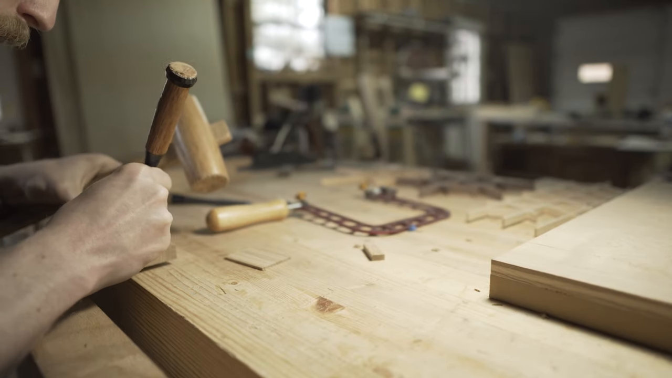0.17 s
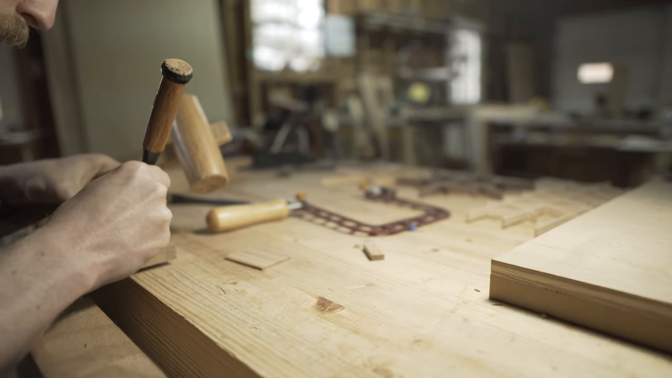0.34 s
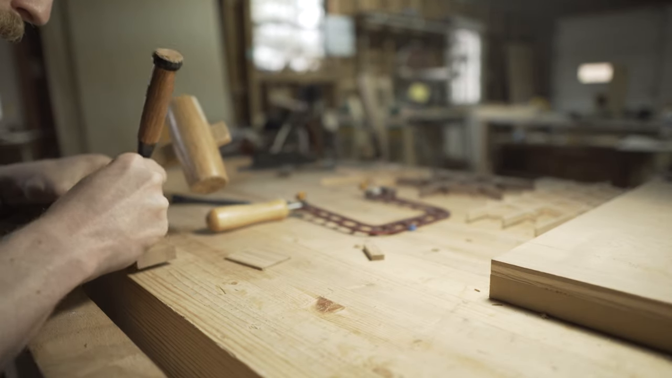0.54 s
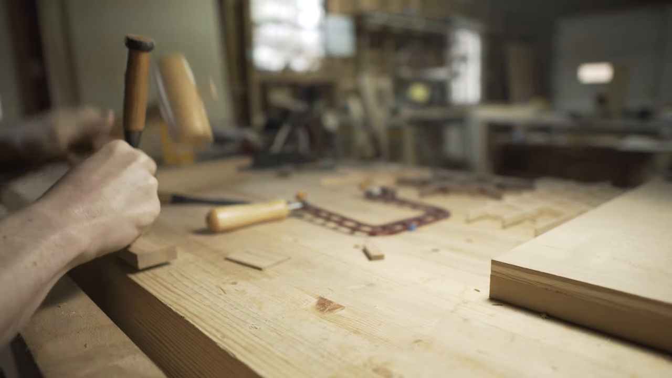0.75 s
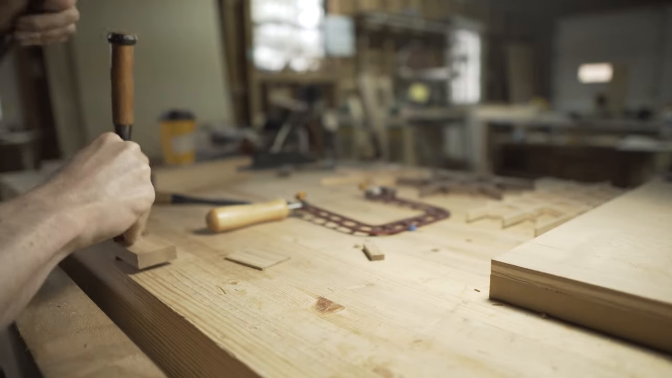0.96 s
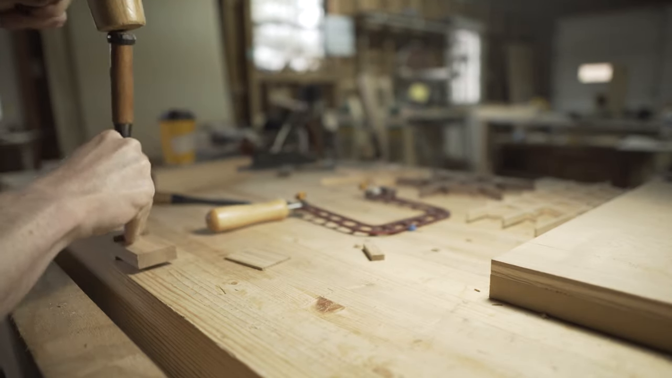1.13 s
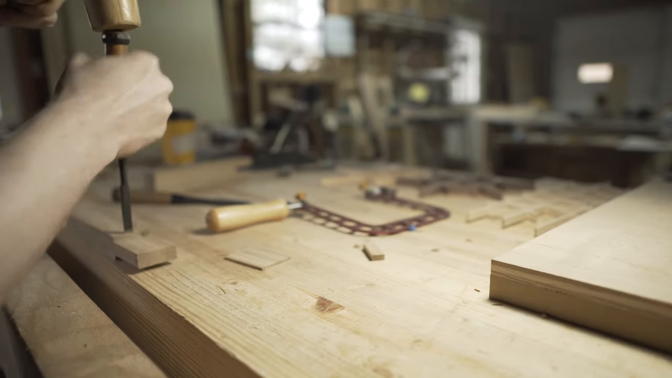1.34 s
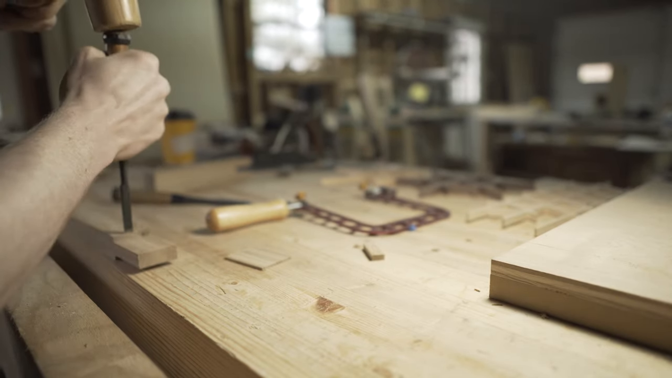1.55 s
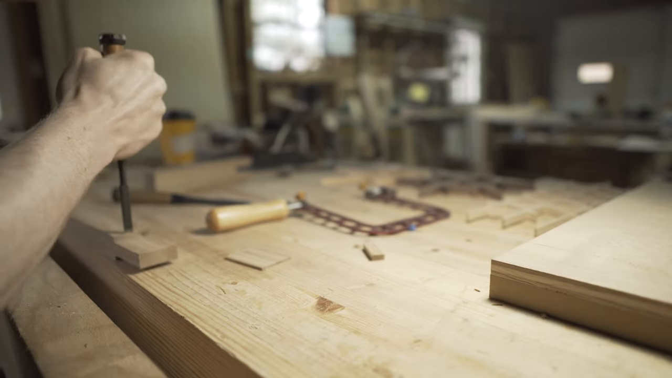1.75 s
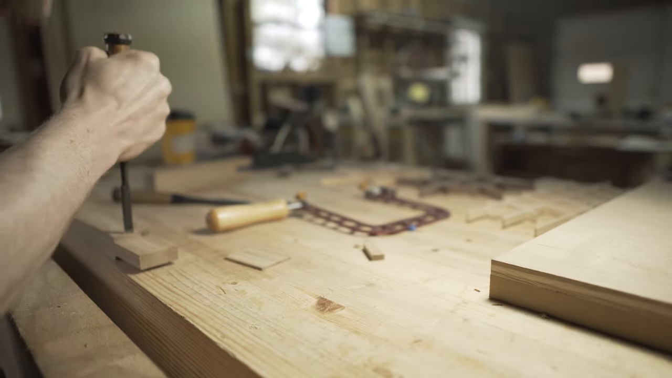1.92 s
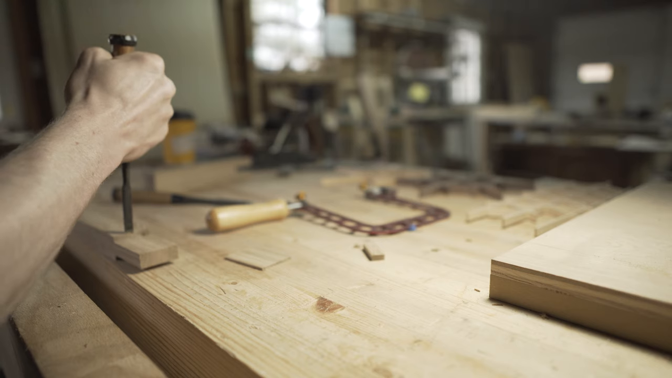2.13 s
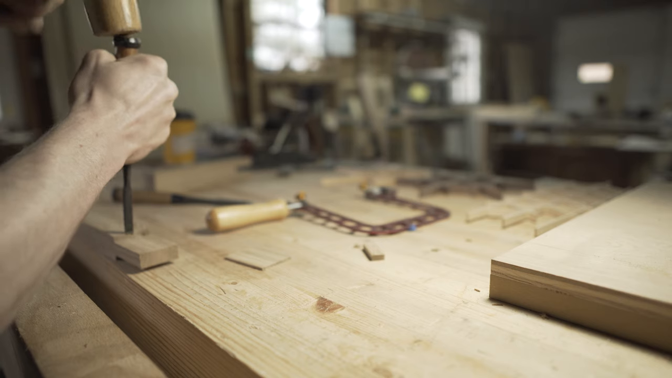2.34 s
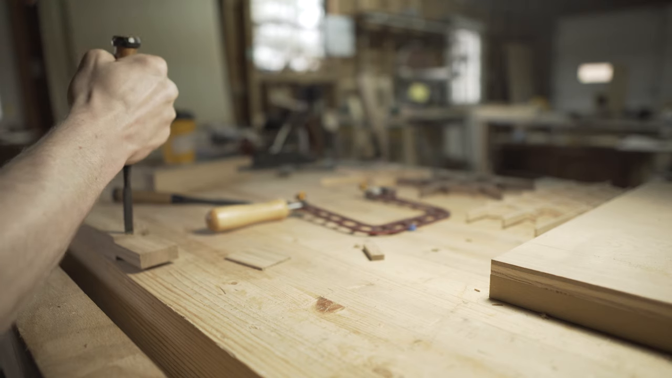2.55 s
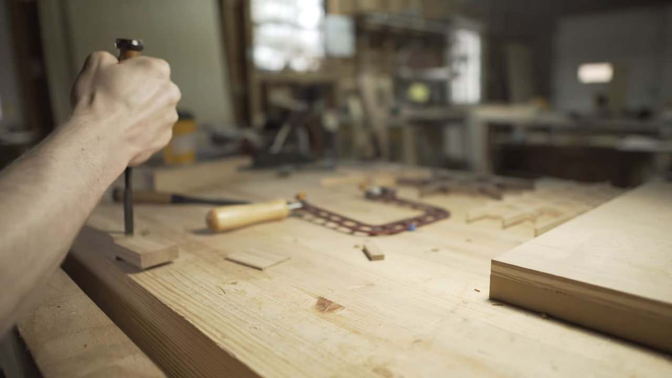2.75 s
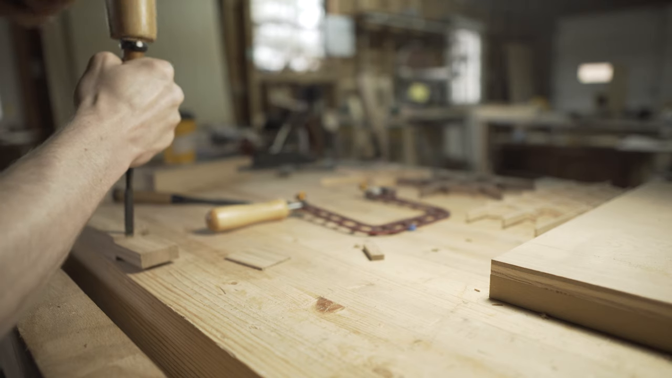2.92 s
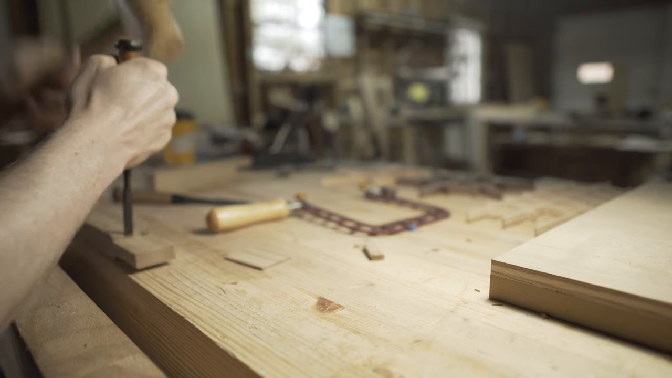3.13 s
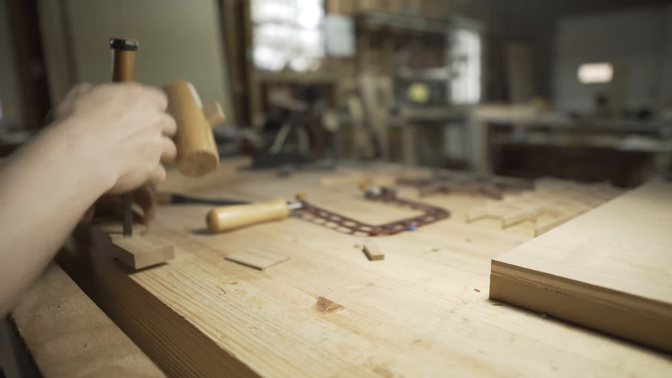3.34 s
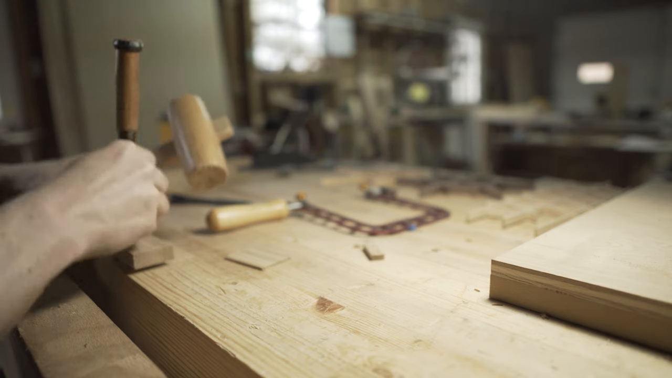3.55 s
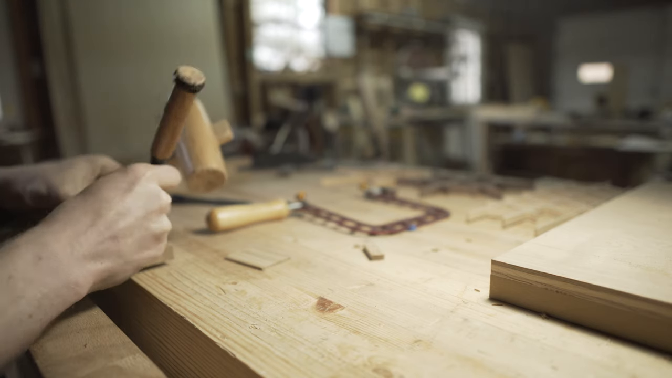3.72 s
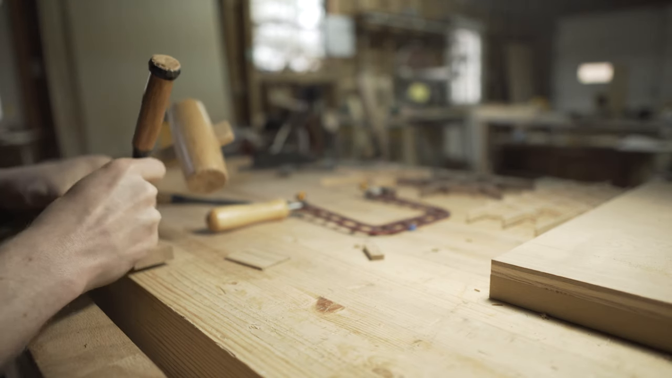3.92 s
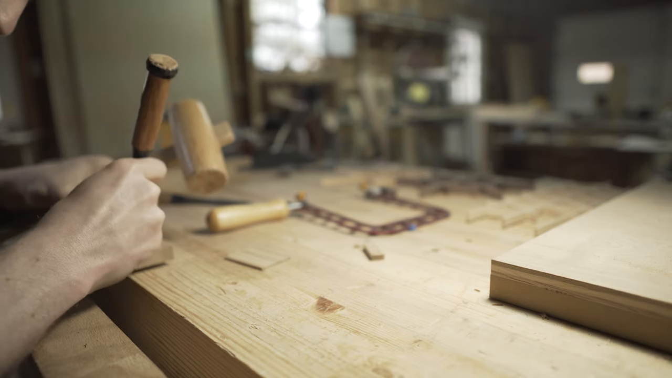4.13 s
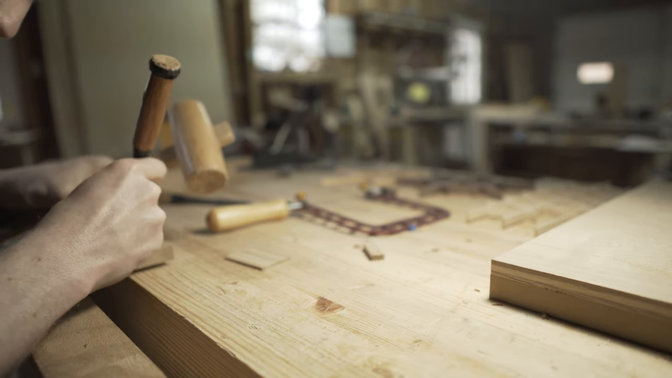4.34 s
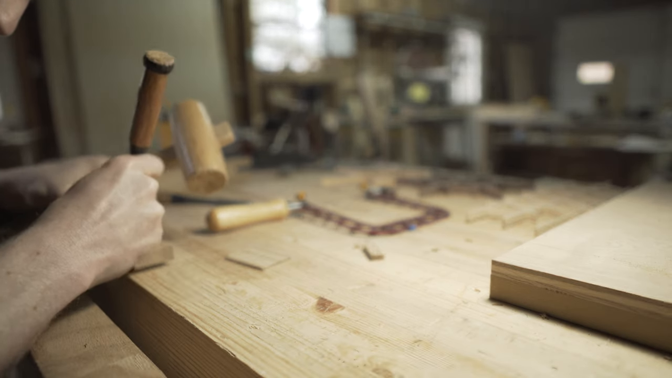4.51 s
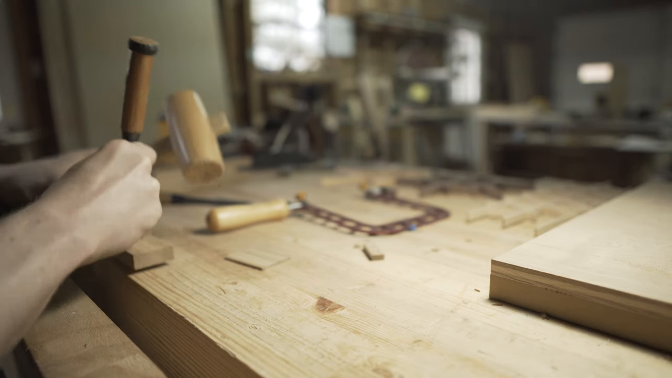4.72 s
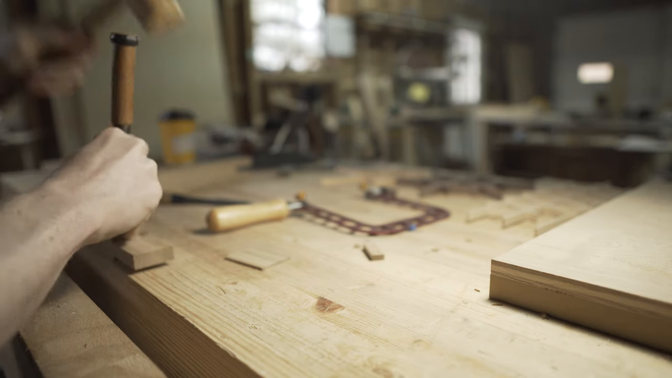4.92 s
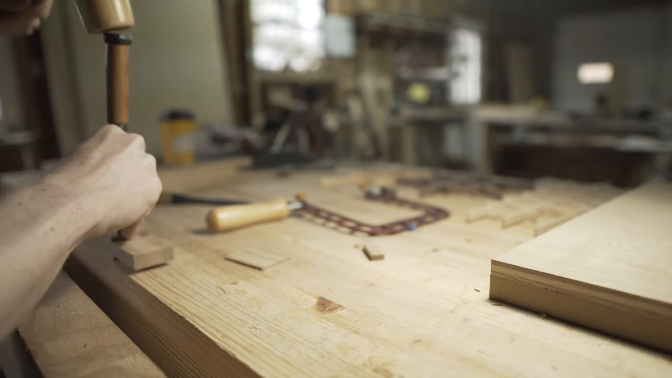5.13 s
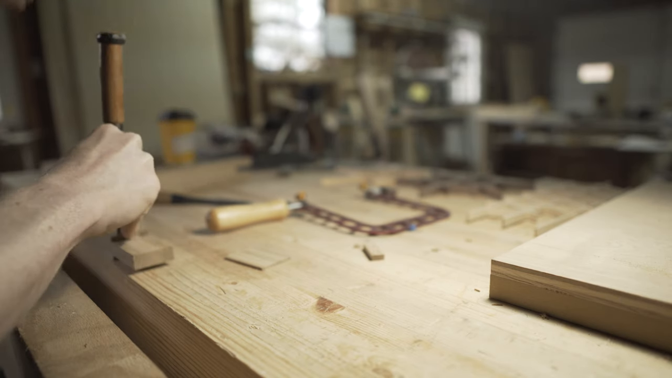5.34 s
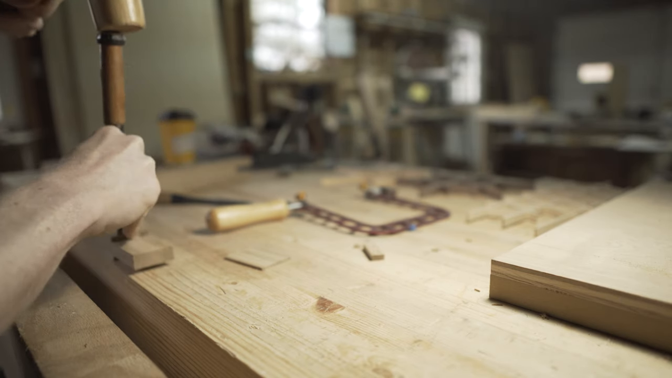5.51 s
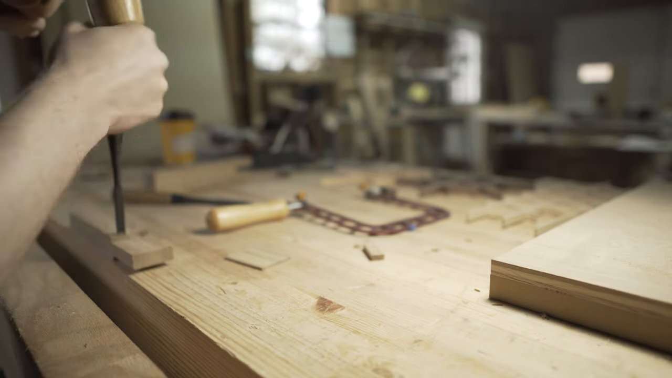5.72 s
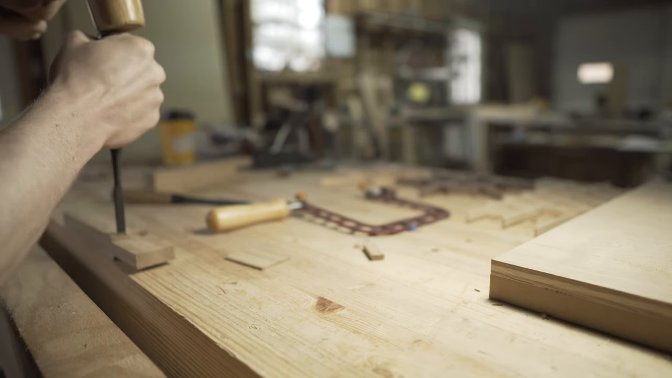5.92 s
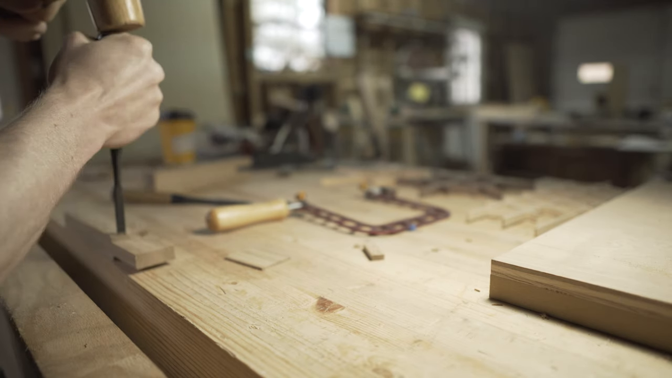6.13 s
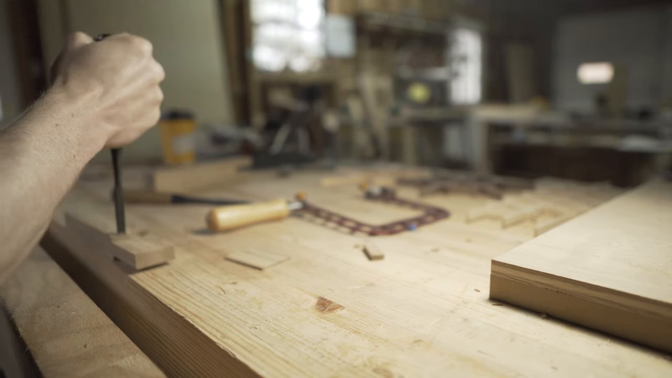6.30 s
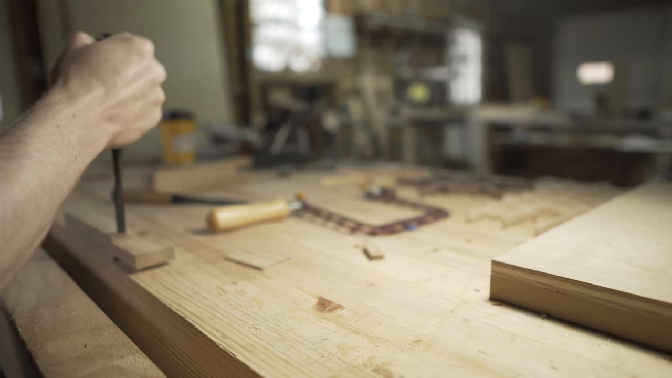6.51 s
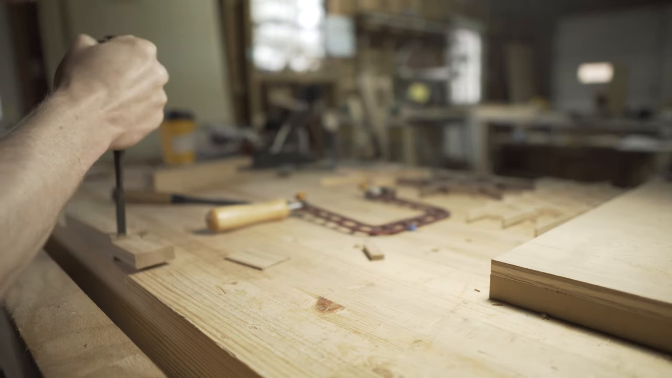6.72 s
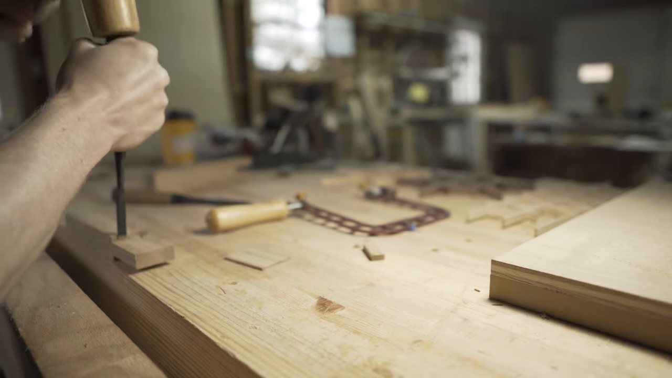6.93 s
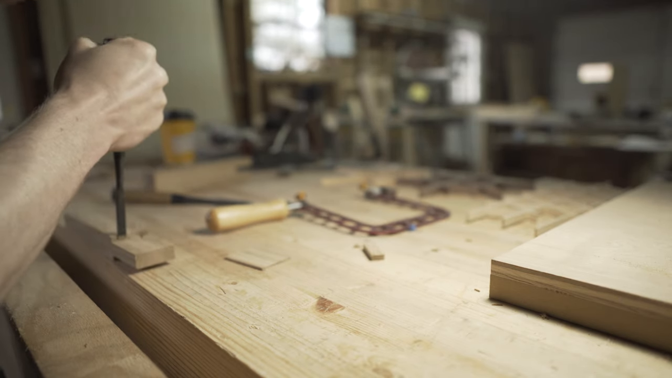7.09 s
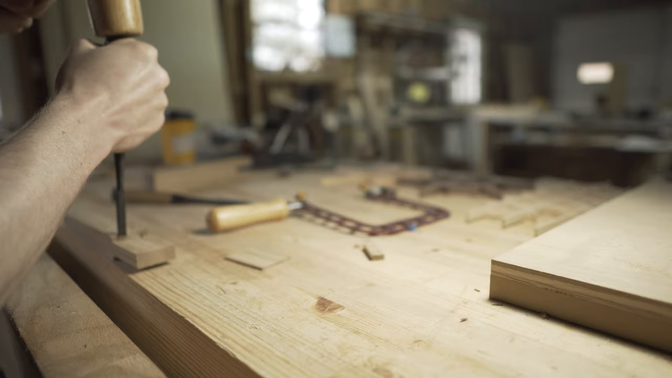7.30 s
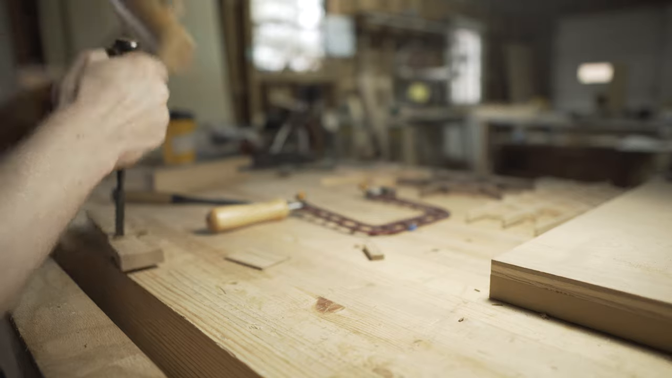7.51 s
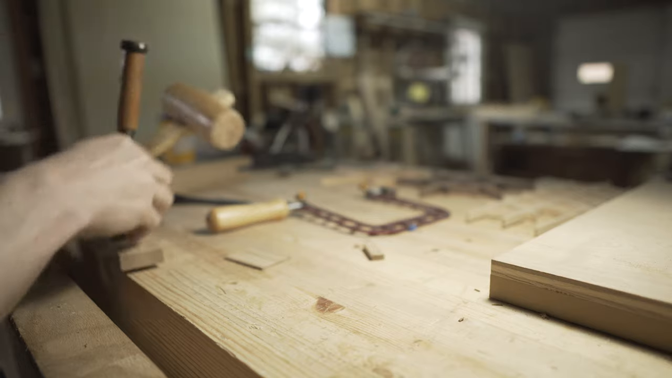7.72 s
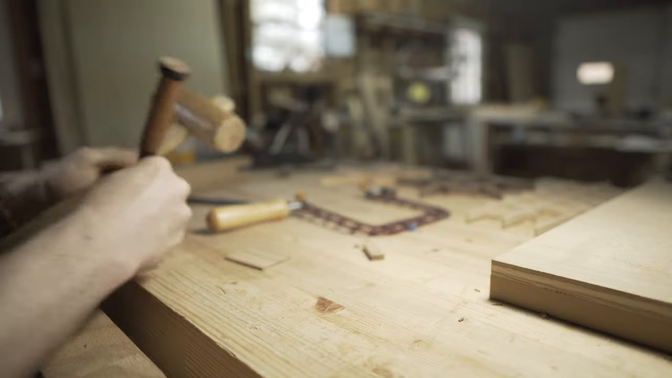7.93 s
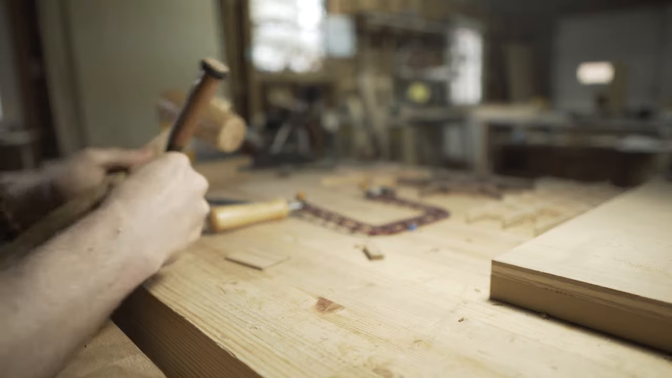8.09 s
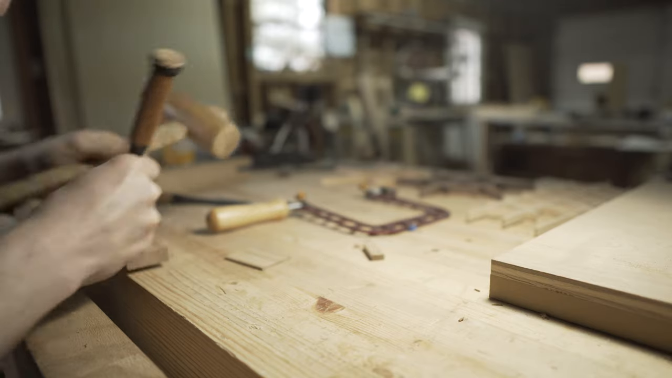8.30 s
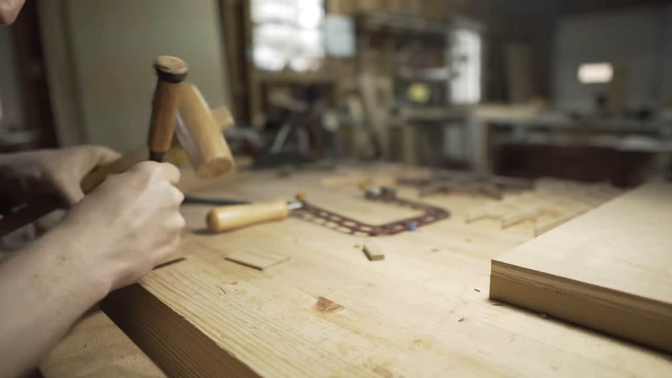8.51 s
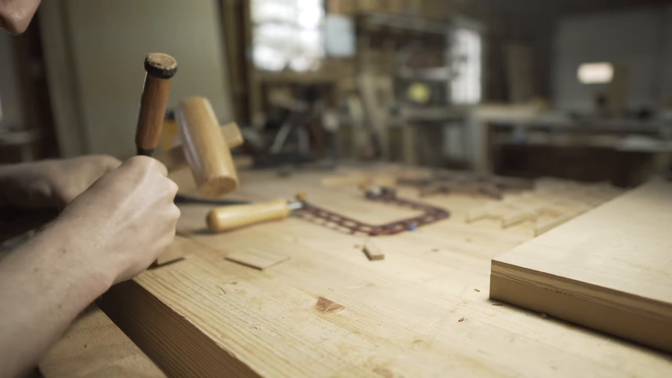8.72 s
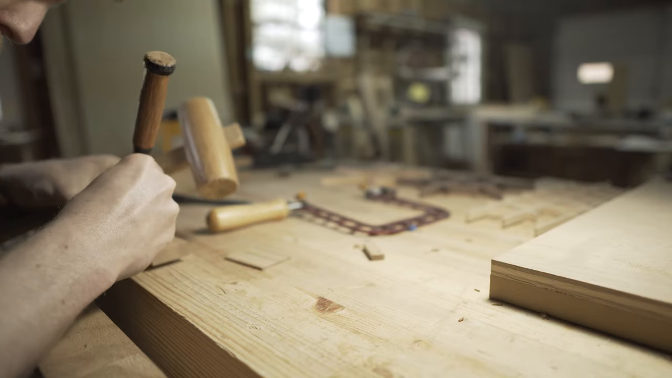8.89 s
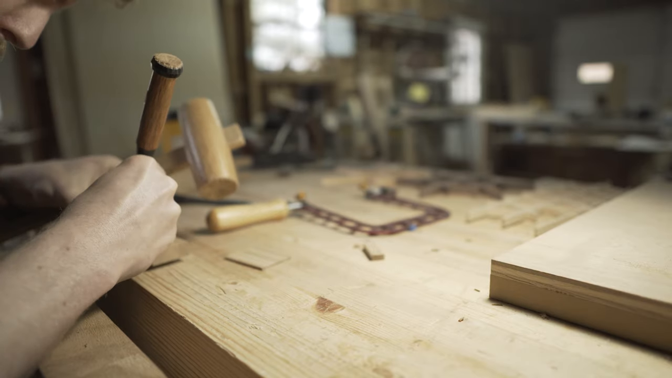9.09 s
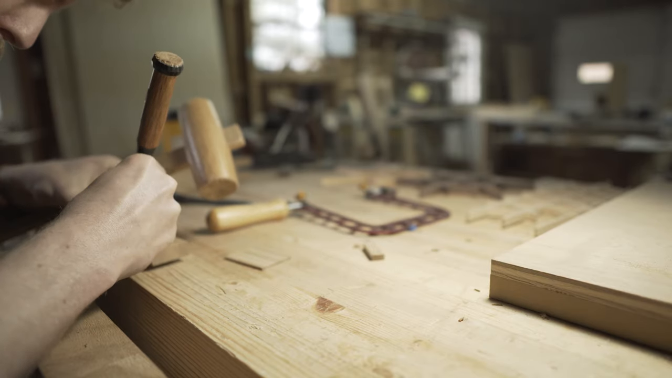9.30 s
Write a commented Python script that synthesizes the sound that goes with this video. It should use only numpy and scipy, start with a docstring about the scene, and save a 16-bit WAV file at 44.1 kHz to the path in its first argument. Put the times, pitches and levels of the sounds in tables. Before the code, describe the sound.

A wooden mallet strikes a chisel in short bursts of sharp, ringing knocks, with pauses and light tool handling in a quiet workshop.

```python
"""A live workshop, a stereo microphone close to the bench, a soft rush of room tone behind.
A wooden mallet drives a chisel into a block in four short bursts. Each blow rings the tools and the
bench and fills the room; the harder the contact, the brighter it is. Between bursts the hand slides
along the chisel, and there are light knocks and ticks as it is pulled free and the tools are lowered.
The recorder's limiter flattens each blow and lets the echo swell back."""
import sys
import numpy as np
from scipy import signal
from scipy.fft import rfft, irfft, next_fast_len
from scipy.io import wavfile
from scipy.ndimage import uniform_filter1d

SR = 44100
rng = np.random.default_rng(int(sys.argv[2]) if len(sys.argv) > 2 else 0)


def persist_wave(psi):
    """Save psi, clipped to +-1, as 16-bit WAV."""
    counts = np.round(np.clip(psi, -1, 1) * 32767).astype(np.int16)
    wavfile.write(sys.argv[1], SR, np.atleast_2d(counts).T)


N = 412335

# The room at the microphone. Each row: frequency in Hz, left-right likeness from 0 to 1.
STEREO_LIKENESS = [(130, 1), (300, 0.98), (600, 0.88), (1100, 0.65), (2200, 0.6), (4500, 0.088),
                   (9000, 0.061)]
# The room tone's rise and fall. Each row: time in seconds, level in dB.
ROOM_LEVEL = [(0, -59.5), (1.9, -57.5), (3.5, -66), (4.4, -69), (5.15, -60.5), (6.5, -60.5), (8.2, -65),
              (8.8, -58), (9.35, -59.5)]
# Spectra of the room's rush and rumble, skin on the chisel, the blade's click, and mallet, handle
# and blade together. Each row: frequency in Hz, relative spectral level in dB.
RUSH_SPECTRUM = [(100, -35.5), (300, -18), (520, -2), (1300, 0), (2200, -2), (4000, -8), (7000, -13.5),
                 (15500, -15)]
RUMBLE_SPECTRUM = [(20, -27), (50, -13.5), (90, -9.5), (185, -8.5), (238, 1), (290, -9.5), (420, -4.5),
                   (1000, -38.5), (4000, -78.5)]
SKIN_SPECTRUM = [(300, -35.5), (1500, -3), (3500, -3.5), (7000, -6), (11000, -2), (15500, -3.5)]
CLICK_SPECTRUM = [(1800, -20), (2900, -7.5), (3800, -9), (6000, -5.5), (11000, -8.5), (14500, 5)]
TOOL_SPECTRUM = [(30, -50.5), (95, -36), (130, -25), (220, -14.5), (330, -7.5), (450, -6), (650, -3.5),
                 (880, -5), (1500, -3.5), (1950, -11.5), (5000, -14.5), (6300, -27), (14000, -31),
                 (16500, -36)]
# Nudges on the bench. Each row: peak time in seconds, pitch in Hz, level in dB, half-width in seconds.
BENCH_BUMPS = [(0.822, 129, -65.5, 0.085), (3.794, 540, -59, 0.013), (4.105, 550, -64, 0.0088),
               (8.195, 535, -71, 0.098), (8.605, 567, -62, 0.051)]
# The hand on the chisel. Each row: peak time in seconds, level in dB, half-width in seconds.
HAND_SLIDES = [(0.873, -55.5, .13), (1.416, -50.5, .09), (3.367, -63.5, 0.21), (4.922, -60.5, .14),
               (5.775, -49.5, .08), (7.605, -58.5, 0.17), (8.354, -61.5, 0.077), (8.637, -59.5, 0.084)]
# Mallet blows. Each row: start in seconds, level in dB, hardness in dB, bench thud in dB, then,
# shifting with grip and bite, wood resonance, blade resonance and hollow, all in Hz.
MALLET_BLOWS = [(1.1169, -10, -11, 3.5, 1914, 6600, 4300), (2.0355, -2.5, 0.5, 0.5, 1520, 2513, 7700),
                (2.3667, -3, 9, -3.5, 705, 5290, 2900), (2.6847, -7, 9.5, -1.5, 1713, 6880, 5440),
                (2.9526, -4.8, 8.5, 0, 695.5, 6160, 3953), (5.1887, -10.5, -18, -1.5, 402, 2070, 5270),
                (5.4868, -3.5, -3.5, -1.5, 786, 7280, 2874), (6.6513, -2.5, 4.5, -7, 600, 7900, 2330),
                (7.0140, -4.5, 7, -5.5, 578, 5240, 5930), (7.2939, -7, 2, 2, 1390, 9370, 6300)]
# Hard contact lifts the treble. Each row: frequency in Hz, lift in dB per dB of hardness.
HARDNESS_LIFT = [(1100, 0), (2400, 0.7259), (5000, 0.91), (9000, 0.92)]
# A solid seat on the bench lifts the bass. Each row: frequency in Hz, lift in dB per dB of thud.
THUD_LIFT = [(150, 0.22), (420, 2), (900, 0)]
# The tools' resonances and the hollows between. Each row: centre in Hz, width in Hz, lift in dB.
TOOL_RESONANCES = [(1096, 140, 10.5), (2219, 73, 7.5), (2698, 430, 4), (3340, 420, -3), (5120, 140, 1),
                   (6900, 700, -1.5), (7370, 360, 8.5), (7930, 250, 4), (9000, 470, -1), (10070, 430, 6),
                   (11600, 400, 2), (13100, 730, 6.5)]
# The workshop's echo. Each row: frequency in Hz, seconds to fall 60 dB.
ROOM_DECAY = [(100, 0.51), (300, 0.79), (1100, 0.63), (2500, 0.6), (5000, 0.51), (8000, 0.42),
              (14000, 0.27)]
# The bench and the free mallet ringing. Each row: pitch in Hz, level in dB, seconds to fall 60 dB.
BENCH_MODES = [(132.4, -30, 0.59), (185.2, -26, 0.5), (241.4, -19, 0.65), (318, -12, 0.57), (364, -22, .6),
               (404, -18, 0.52), (509, -9.5, 0.26), (569.7, -11, 0.66), (676, -13.5, 0.52),
               (744, -18.5, 0.57), (995, -15, 0.23), (1092, -16.5, 0.5), (1135, -17.5, .7),
               (1216, -24.5, 0.45), (1367, -26.5, 0.44), (1354, -18.5, 0.46), (1510, -21, 0.69),
               (1470, -21, 0.28), (2360, -22.5, 0.4)]
MALLET_MODES = [(694, -7.5, 0.95), (1154, 3, 0.63), (1530, -7, 0.57), (1720, 7, 0.086), (2270, 0.5, 0.22),
                (2684, -4.5, 0.37), (4600, -22, 0.22)]
# Light knocks and ticks. Each row: start in seconds, level in dB, brightness in dB per octave,
# resonance in Hz, relative level of the mallet's ring in dB.
LIGHT_KNOCKS = [(3.390, -33, -1, 6000, -24), (3.782, -61.5, 12, 5500, -41), (7.991, -56, 10, 8700, -36),
                (8.079, -48.5, 0.5, 1650, -35), (8.6738, -29, 0, 6200, -17.5)]

DIRECT_DB, ECHO_DB, BENCH_DB = 5, -4.5, -4  # balance within a blow
ECHO_RISE_S, ECHO_RENEWAL = 0.013, 0.3  # build-up time; share of the echo's power new to each blow
PUSH_DB, SQUEEZE_S = 12, 0.0012  # the mallet's first push; the time the wood takes to compress
RUMBLE_DB, KNOCK_ECHO_DB = -15.5, -15  # rumble under the rush; echo under a light knock


def amp(db):
    """Decibels to gain."""
    return 10 ** (np.asarray(db) / 20)


def unit(x):
    """Scale to rms 1."""
    return x / np.sqrt(np.mean(x ** 2) + 1e-20)


def along(points, hz):
    """Read a curve of (Hz, value) points on a log frequency axis."""
    point_hz, values = np.transpose(points)
    return np.interp(np.log(hz + 1), np.log(point_hz + 1), values)


def hump(hz, centre, width):
    """The shape of one resonance, 1 at its centre."""
    return 1 / (1 + (2 * (hz - centre) / width) ** 2)


def filtered(x, response):
    """Filter x by the gain response(hz)."""
    size = x.shape[-1]
    padded = next_fast_len(size + 8192)
    return irfft(rfft(x, padded) * response(np.fft.rfftfreq(padded, 1 / SR)), padded)[..., :size]


def causal(gain):
    """The response with this gain that rings only after its cause."""
    cepstrum = irfft(np.log(np.maximum(gain, 1e-6)))
    half = len(cepstrum) // 2
    return np.exp(rfft(cepstrum * np.r_[1, np.full(half - 1, 2), 1, np.zeros(half - 1)]))


def stereo_noise(size):
    """White noise, alike left and right in the bass and unrelated in the treble."""
    def mid_side_gains(hz):
        angle = np.arccos(np.clip(along(STEREO_LIKENESS, hz), -1, 1)) / 2
        return np.array([np.cos(angle), np.sin(angle)])
    mid, side = filtered(rng.standard_normal((2, size)), mid_side_gains)
    return np.array([mid + side, mid - side])


def rush(spectrum):
    """Steady stereo noise of rms 1 with this spectrum."""
    return unit(filtered(stereo_noise(N), lambda hz: amp(along(spectrum, hz))))


def swell(peak_s, half_width_s):
    """A bell-shaped rise and fall."""
    return np.exp(-0.5 * ((np.arange(N) / SR - peak_s) / half_width_s) ** 2)


def add(out, start_s, x):
    """Mix x into out from start_s on."""
    start = round(start_s * SR)
    out[:, start:start + x.shape[1]] += x[:, :N - start]


def room_tone():
    """All around, a soft rush and rumble sink together after the long bursts and return."""
    level_db = np.interp(np.arange(N) / SR, *np.transpose(ROOM_LEVEL))
    return amp(level_db) * (rush(RUSH_SPECTRUM) + amp(RUMBLE_DB) * rush(RUMBLE_SPECTRUM))


def bench_bumps():
    """Hands and tools bump and drag on the bench: soft swells of noise around one pitch."""
    out = np.zeros((2, N))
    for peak_s, hz, db, half_width_s in BENCH_BUMPS:
        band = [(hz / 4, -50), (hz * 0.75, -20), (hz, 0), (hz * 1.3, -17), (hz * 8, -42), (SR / 2, -70)]
        out += amp(db) * swell(peak_s, half_width_s) * rush(band)
    return out


def hand_slides():
    """Left of the microphone, skin hisses up the chisel before a burst and down after it."""
    power = sum((amp(db) * swell(peak_s, half_width_s)) ** 2 for peak_s, db, half_width_s in HAND_SLIDES)
    return np.sqrt(power) * rush(SKIN_SPECTRUM) * amp([[3], [-6]])


def contact(judder_t60, click_db, click_t60):
    """The direct sound: one push, a brief judder of wood on wood, the blade's click on the left."""
    t = np.arange(SR) / SR
    push = -amp(PUSH_DB) * signal.unit_impulse(SR, round(SQUEEZE_S * SR / 2))
    click = filtered(rng.standard_normal((2, SR)), lambda hz: amp(along(CLICK_SPECTRUM, hz)))
    click *= amp(click_db - 60 * t / click_t60) * amp([[4], [-3]])
    judder = stereo_noise(SR) * amp(-60 * t / judder_t60) * amp([[-2], [2]])
    squeeze = 1 - np.exp(-(t / SQUEEZE_S) ** 2)
    return push + squeeze * (judder + click)


def tool_body(x, colour):
    """Pass x through the resonances of mallet and chisel, tinted by colour(hz) in dB."""
    hz = np.fft.rfftfreq(4096, 1 / SR)
    resonance_db = sum(db * hump(hz, centre, width) for centre, width, db in TOOL_RESONANCES)
    body = unit(amp(along(TOOL_SPECTRUM, hz) + resonance_db))
    ring = irfft(causal(body * amp(colour(hz))))
    return signal.fftconvolve(x, ring[None], axes=1)[:, :SR]


def blow_colour(hz, hardness_db, thud_db, wood_hz, blade_hz, hollow_hz):
    """One blow's tint in dB: treble from hardness, bass from the bench, two resonances and a hollow."""
    wood = 7 * hump(hz, wood_hz, width=0.18 * wood_hz)  # shifts with the grip
    blade = 8.5 * hump(hz, blade_hz, width=0.16 * blade_hz)  # shifts with the bite
    hollow = -6 * hump(hz, hollow_hz, width=0.14 * hollow_hz)  # the blade's resonances cancel here
    return hardness_db * along(HARDNESS_LIFT, hz) + thud_db * along(THUD_LIFT, hz) + wood + blade + hollow


def block_ripple(depth_db):
    """The block's many weak modes shift as the chisel sinks: random (Hz, dB) points."""
    hz = np.geomspace(300, 15000, num=140)
    return np.c_[hz, depth_db * rng.standard_normal(len(hz))]


def ringing(modes, colour, rise_s):
    """Struck wood rings as damped sines, at slightly new strengths each time."""
    t = np.arange(SR) / SR
    ring = np.zeros(SR)
    for hz, db, t60 in modes:
        struck_db = db + colour(hz) + rng.normal(0, 1.0)
        ring += amp(struck_db - 60 * t / t60) * np.sin(2 * np.pi * (hz * t + rng.random()))
    return ring * (1 - np.exp(-t / rise_s))


def workshop_echo():
    """One second of the room's answer; the treble dies first."""
    hz, t, spectra = signal.stft(stereo_noise(SR), SR, nperseg=256)
    decay = amp(-60 * t / along(ROOM_DECAY, hz)[:, None])
    return signal.istft(spectra * decay, SR, nperseg=256)[1][:, :SR]


def mallet_blows():
    """Each blow rings tools, bench and room; landing on one spot, the blows share most of their echo."""
    out, t = np.zeros((2, N)), np.arange(SR) / SR
    shared_echo = workshop_echo()
    for start_s, db, hardness_db, thud_db, wood_hz, blade_hz, hollow_hz in MALLET_BLOWS:
        colour = lambda hz: blow_colour(hz, hardness_db, thud_db, wood_hz, blade_hz, hollow_hz)
        block = block_ripple(depth_db=1.0)
        echo = np.sqrt(1 - ECHO_RENEWAL) * shared_echo + np.sqrt(ECHO_RENEWAL) * workshop_echo()
        echo *= 1 - np.exp(-t / ECHO_RISE_S)
        click_db = 16 - 0.23 * hardness_db  # the click stands out more in a dull blow
        direct = contact(judder_t60=0.029, click_db=click_db, click_t60=0.0091)
        strike = amp(DIRECT_DB) * direct + amp(ECHO_DB) * echo
        knock = tool_body(strike, lambda hz: colour(hz) + along(block, hz))
        bench = amp(BENCH_DB) * ringing(BENCH_MODES, colour, rise_s=0.0022)
        add(out, start_s, amp(db) * (knock + bench))
    return out


def light_knocks():
    """A little to the left, light knocks and ticks as the chisel is pulled free and tools are lowered."""
    out = np.zeros((2, N))
    for start_s, db, db_per_octave, peak_hz, ring_db in LIGHT_KNOCKS:
        tilt = lambda hz: db_per_octave * np.log2(np.clip(hz, 300, 6000) / 1500)
        colour = lambda hz: tilt(hz) + 8 * hump(hz, peak_hz, width=0.2 * peak_hz)
        direct = contact(judder_t60=0.022, click_db=4, click_t60=0.019)
        knock = tool_body(direct + amp(KNOCK_ECHO_DB) * workshop_echo(), colour) * amp([[2.5], [-2]])
        mallet = amp(ring_db) * ringing(MALLET_MODES, tilt, rise_s=0.00073)
        add(out, start_s, amp(db) * (knock + mallet))
    return out


def scene():
    """Everything that reaches the microphone."""
    return mallet_blows() + light_knocks() + hand_slides() + bench_bumps() + room_tone()


def limiter(x, ceiling_db, release_s):
    """Gain drops at once when the level passes the ceiling, then recovers."""
    power = np.abs(uniform_filter1d(np.mean(x ** 2, axis=0), size=130))
    excess_db = np.maximum(10 * np.log10(power + 1e-12) - ceiling_db, 1e-6)
    age = np.arange(N) / SR / release_s
    reduction_db = np.exp(np.maximum.accumulate(np.log(excess_db) + age) - age)
    return x * amp(-reduction_db)


def record(dry):
    """The recorder limits the blows and keeps nothing above 16.2 kHz."""
    return filtered(limiter(dry, ceiling_db=-16.0, release_s=0.047), lambda hz: hz < 16200)


dry = scene()
out = record(dry)
persist_wave(out)
```